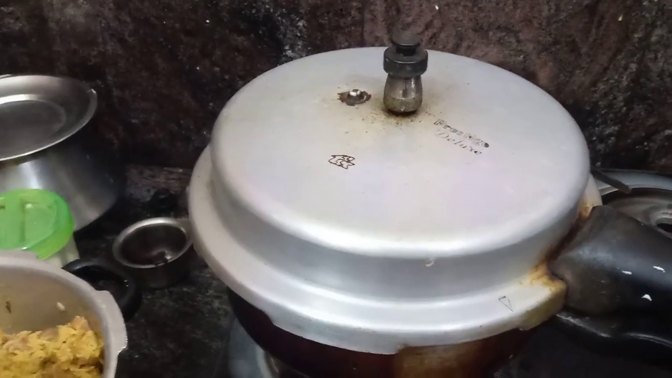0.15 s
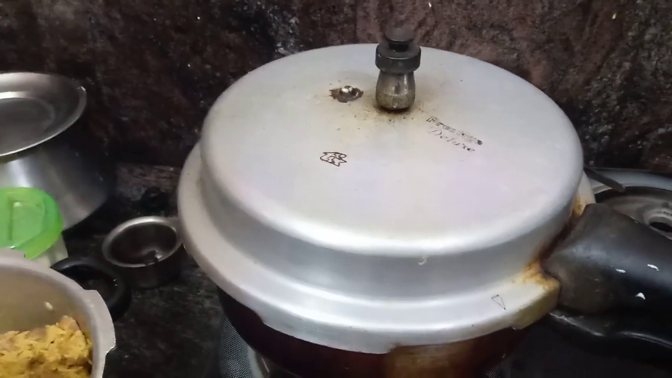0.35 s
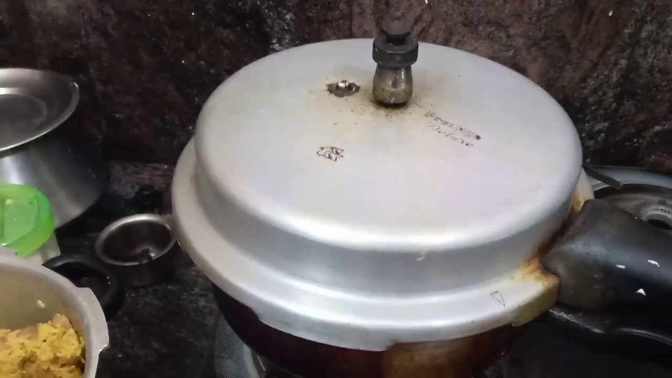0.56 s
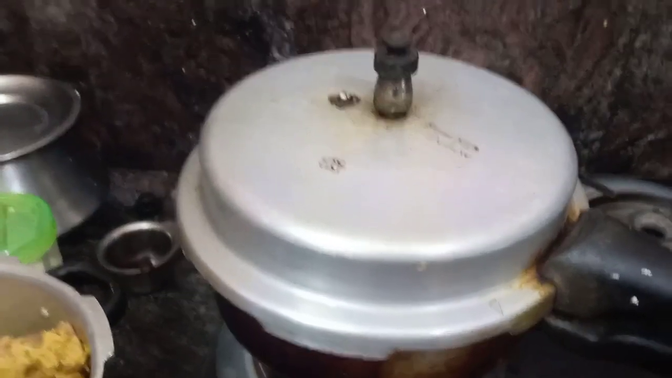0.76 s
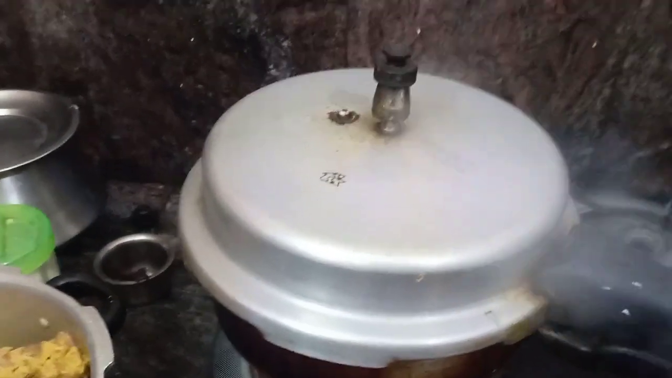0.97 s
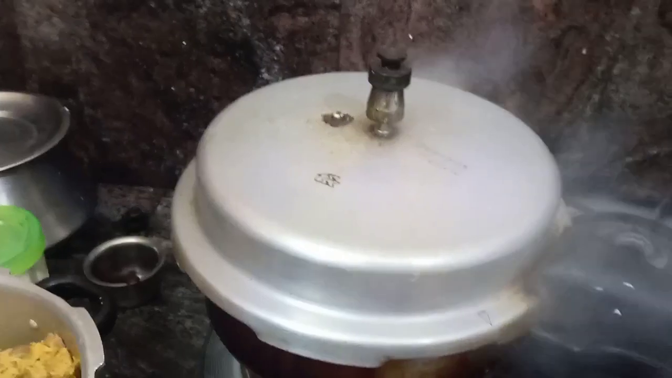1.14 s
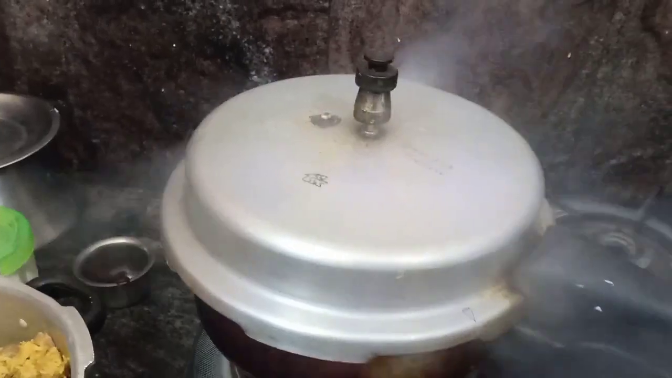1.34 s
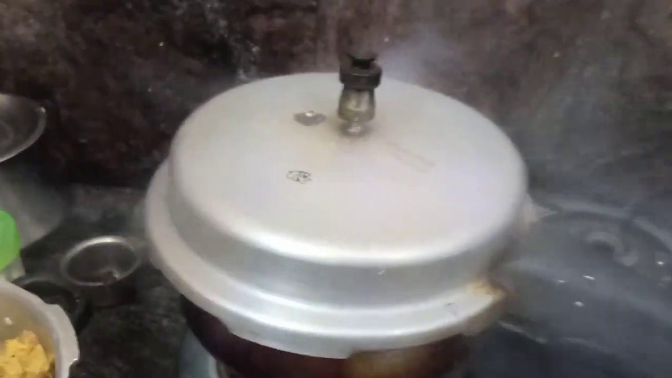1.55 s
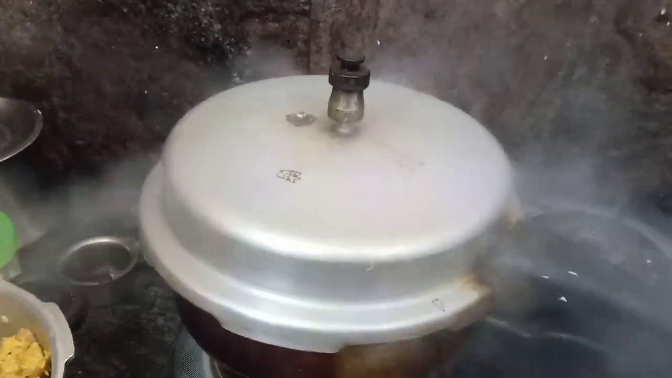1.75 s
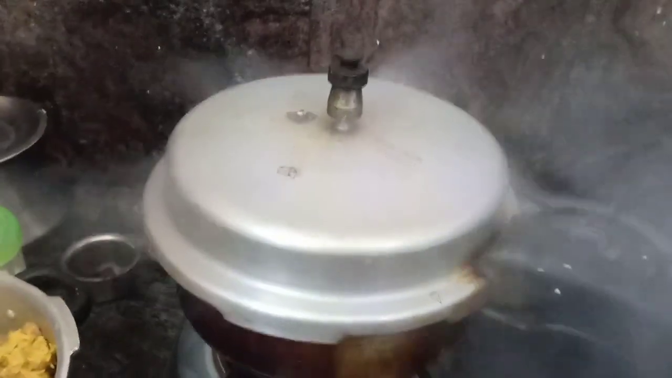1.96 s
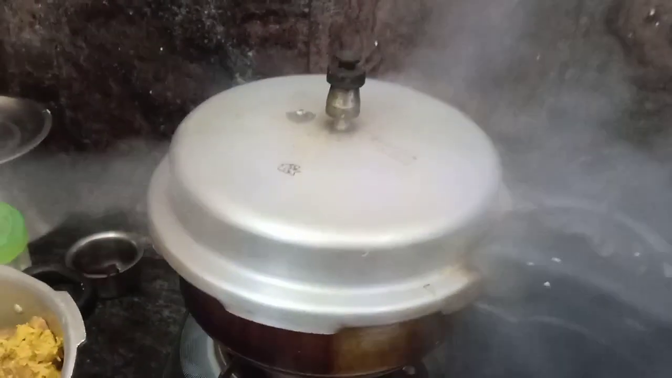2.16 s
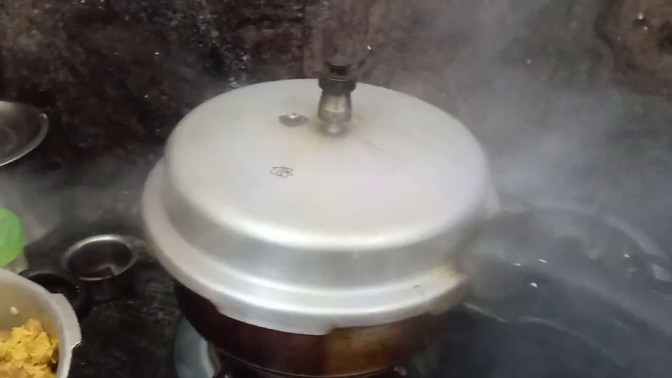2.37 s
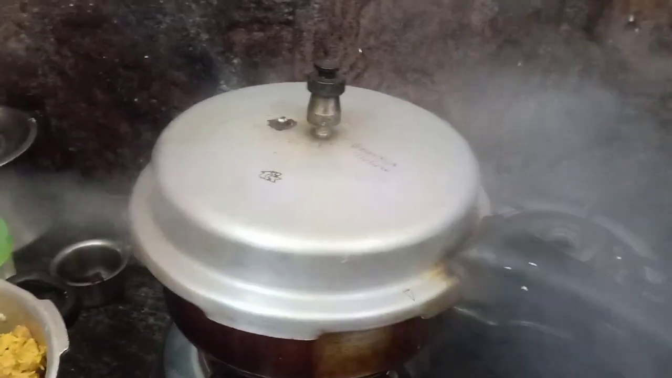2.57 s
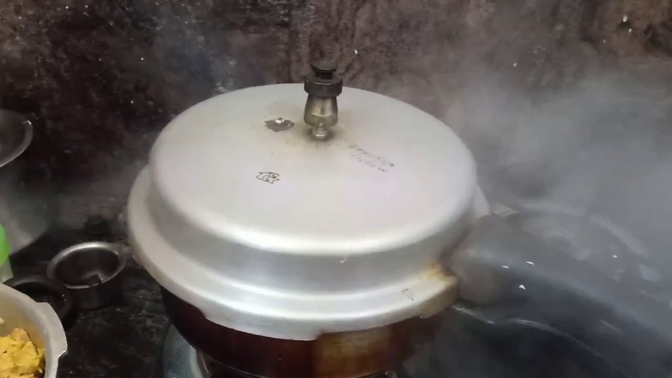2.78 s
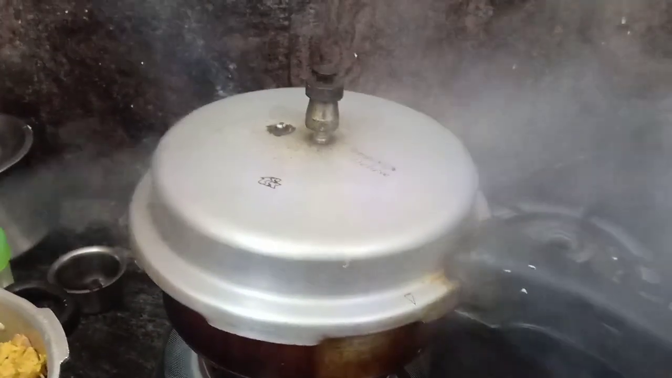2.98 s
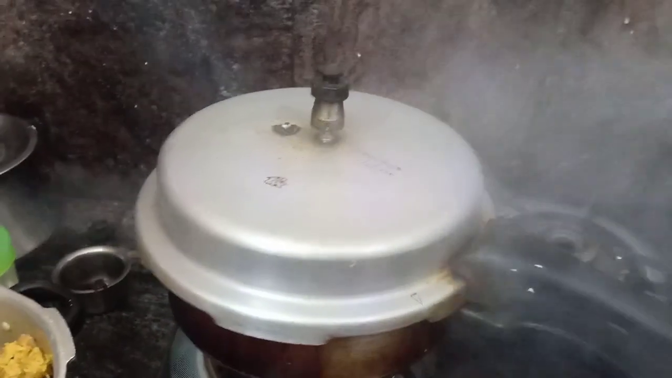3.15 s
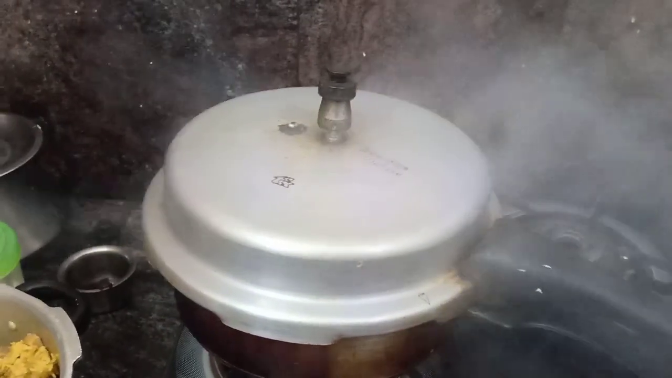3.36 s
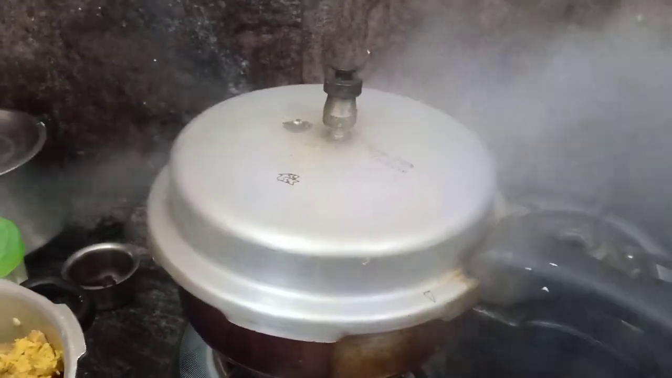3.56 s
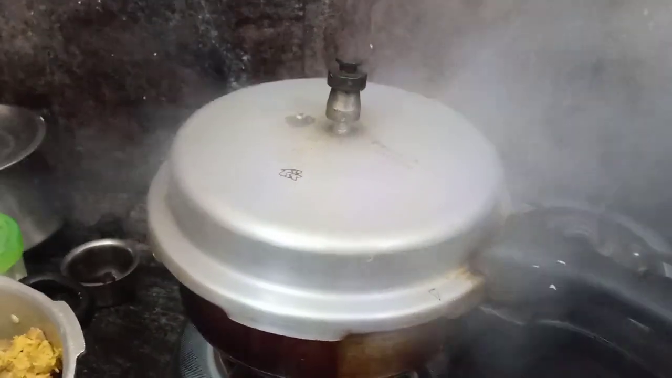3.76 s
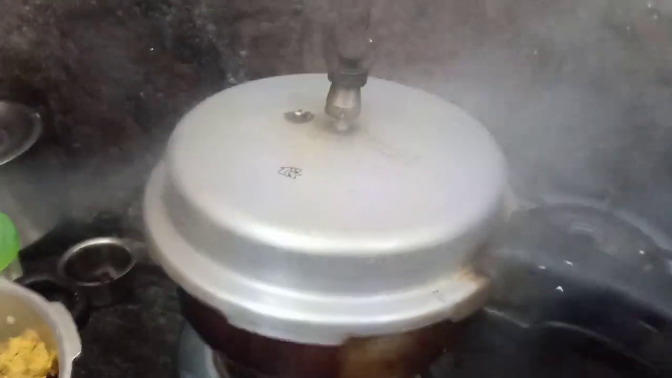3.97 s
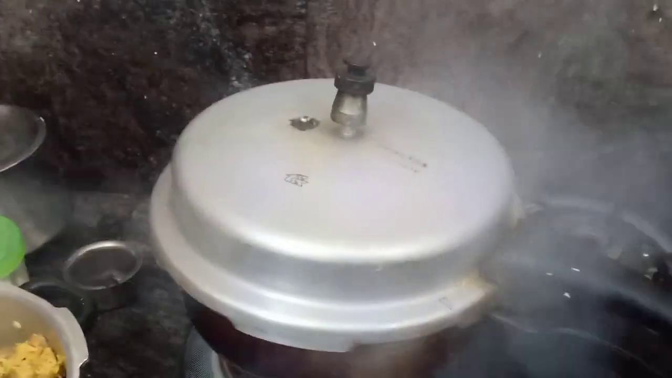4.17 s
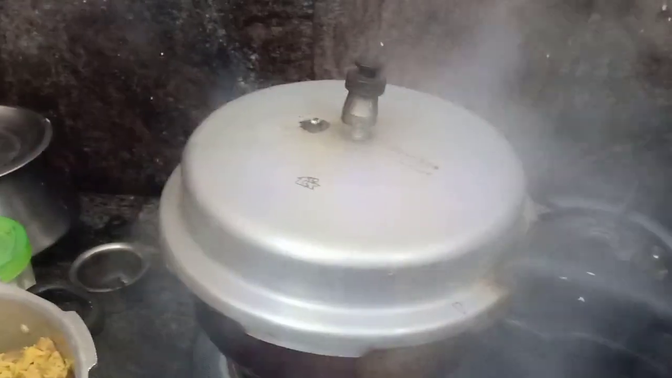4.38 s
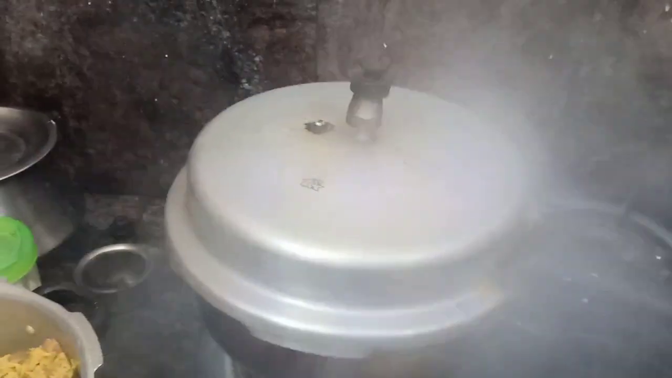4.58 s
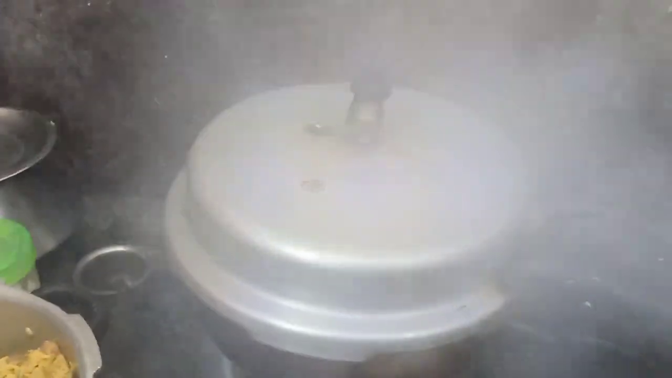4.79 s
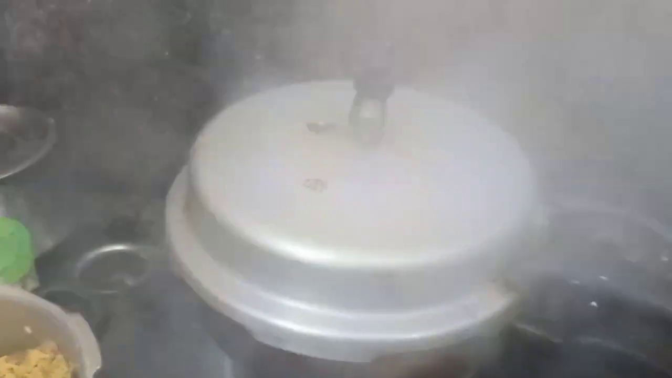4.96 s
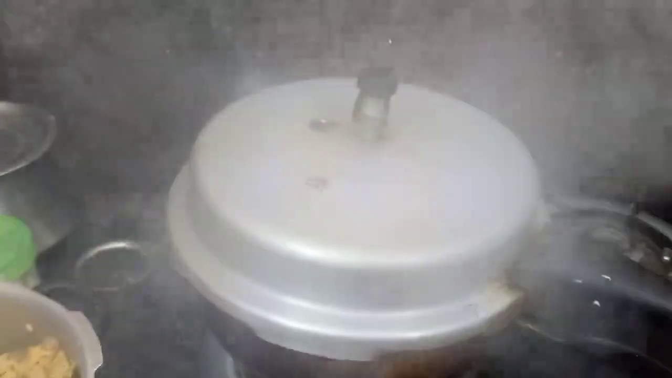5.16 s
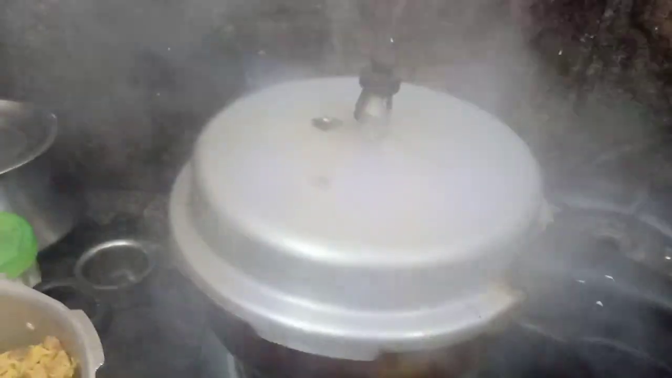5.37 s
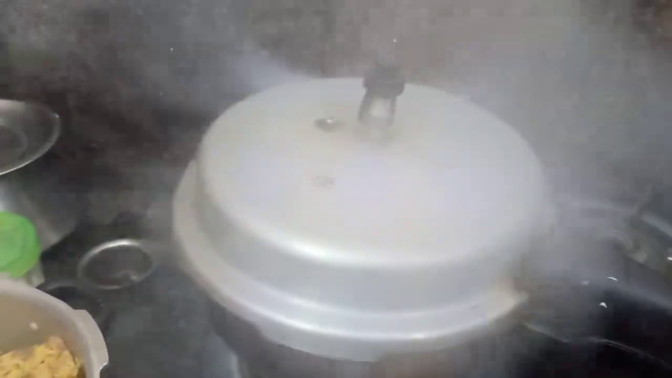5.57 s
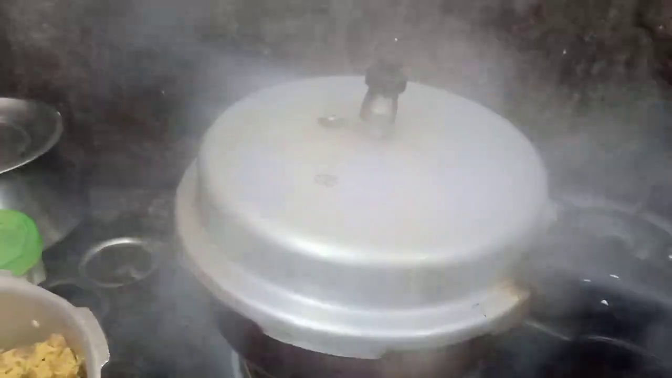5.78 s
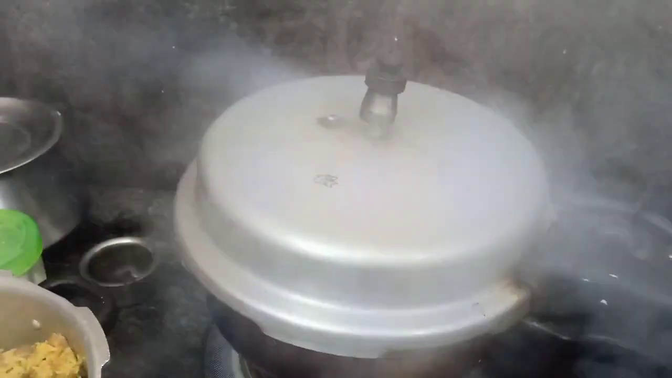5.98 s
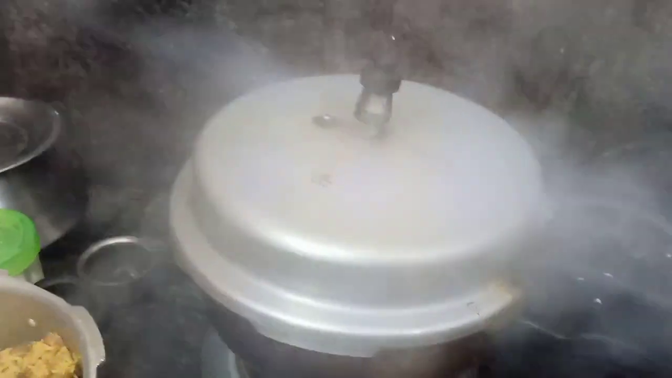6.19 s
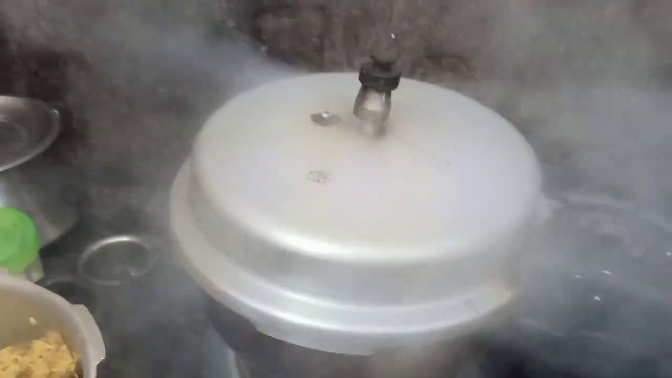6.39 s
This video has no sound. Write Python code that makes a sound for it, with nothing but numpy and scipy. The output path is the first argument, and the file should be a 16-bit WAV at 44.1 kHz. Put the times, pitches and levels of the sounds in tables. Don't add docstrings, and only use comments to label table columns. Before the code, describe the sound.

A thin pressure-cooker hiss sputters and knocks, then bursts into a loud roaring steam jet, crackling and popping from overload until the end.

```python
import sys
import numpy as np
from scipy import signal
from scipy.io import wavfile
from scipy.ndimage import uniform_filter1d

SR = 44100
rng = np.random.default_rng(int(sys.argv[2]) if len(sys.argv) > 2 else 0)


def makeup_ratio(level_db):
    decades = np.asarray(level_db, float) / 20
    return 10 ** decades


def bounce(signal):
    frames = np.transpose(np.atleast_2d(signal))
    limited = np.clip(frames, -1, 1)
    pcm = np.round(limited * 32767).astype(np.int16)
    wavfile.write(sys.argv[1], SR, pcm)


N = 283563
T = np.arange(N) / SR
HZ, HOP = np.fft.rfftfreq(1024, 1 / SR), 256
FRAME_S = np.arange(N // HOP + 5) * HOP / SR

# time in seconds, level in dB.
LEAK_LEVEL = [
    (0.0, -38.5),
    (0.51, -37.5),
    (0.52, -34),
    (0.64, -31),
    (0.66, -30),
    (0.715, -27),
    (0.735, -25),
    (0.752, -32),
    (0.78, -26.5),
]
# frequency in Hz, left level in dB, right level in dB.
LEAK_COLOUR = [(900, -26, -32), (1360, -14.5, -16), (2570, -7.5, -7), (3600, -9.5, -7.5), (4200, -3.5, -12),
               (4900, -2, -7.5), (5800, -2, -13.5), (6640, -6.5, -17), (7600, -14.5, -23), (9600, -19, -35),
               (11500, -13, -23), (13200, -18, -28), (15400, -14.5, -30.7)]
# frequency in Hz, width in Hz, lift in dB.
LEAK_PEAKS = [(4700, 220, 2), (5860, 170, 5), (6540, 77, -2), (2530, 210, 0.5)]
# frequency in Hz, level in dB per Hz.
ROOM_COLOUR = [(18, -48), (30, -37), (70, -5), (93, -30), (140, -10), (367, -7), (477, -4), (526, -14.5),
               (846, -7), (1500, -18.5), (1950, -48), (3300, -120)]
# frequency in Hz, likeness from 0 to 1.
ROOM_LIKENESS = [(60, .99), (290, 0.87), (640, 0.46), (1400, .05)]
# start in seconds, peak in dB, pitch in Hz.
SPUTTERS = [
    (0.294, -27, 5340),
    (0.521, -27, 5530),
    (0.6206, -21, 5200),
    (0.656, -13.5, 5700),
    (0.6905, -14, 5600),
    (0.729, -13, 5800),
]
# time in seconds, level in dB, wetness from 0 to 1.
JET_FLOW = [(0.76, -18.5, 0.2), (0.88, -18, 0.5), (1.2, -25.5, 0.18), (1.42, -23.5, 0.2),
            (1.47, -20.5, 0.2), (1.6, -20, 0.2), (1.75, -23, 0.22), (2.7, -22.5, 0.24), (3.3, -21.5, 0.22),
            (3.63, -22.5, 0.27), (3.85, -24, 0.61), (5.83, -23.5, 1), (5.86, -25.5, 0.98),
            (6.43, -24.5, 0.94)]
# frequency in Hz, left level in dB, right level in dB.
DRY_STEAM = [(121, -17, -35), (704, -17.5, -23.5), (1390, -20.5, -23.5), (1850, -11, -13), (2600, -6, -6),
             (3420, -6, -4.4), (3700, -5, -3.5), (4400, 0.5, -5), (5820, -4, -11.5), (6700, -12, -18.5),
             (7900, -12.5, -23.5), (9600, -15.5, -24.5), (12700, -13, -26), (17400, -14, -24)]
# frequency in Hz, left level in dB, right level in dB.
WET_STEAM = [(120.8, -31.5, -51), (714, -12.5, -21), (1290, -16.5, -17.5), (1810, -8.3, -10),
             (2670, 1.5, 0), (3420, -3.5, -1.5), (4000, 1, -1.5), (4980, 0, -6.5), (5660, 2, -4),
             (7900, -2, -12.5), (8100, -4.5, -16), (9530, -7, -20), (12700, -6.5, -17), (17000, -3, -13)]
# frequency in Hz, width in Hz, lift in dB.
JET_PEAKS = [(11350, 650, 5), (13550, 750, 5.5)]
# frequency in Hz, width in Hz, lift in dB.
LEFT_ECHO_PEAKS = [(2560, 50, 3), (2760, 90, 4), (3560, 60, 3), (4050, 70, 7), (4975, 110, 6.5),
                   (5333, 50, 6.5), (6815, 60, 2.5), (8010, 150, 3)]
# frequency in Hz, width in Hz, lift in dB.
RIGHT_ECHO_PEAKS = [(2590, 90, 4), (2840, 70, 3), (3424, 60, 2.5), (3935, 60, 6.5), (4785, 60, 3),
                    (5047, 60, 3), (7007, 120, 4)]
# frequency in Hz, likeness from 0 to 1.
STEAM_LIKENESS = [(1500, .05), (2600, .6), (3200, .3), (3900, .8), (4700, .75), (5600, .3), (8000, .05)]
# frequency in Hz, lead in radians.
LEFT_LEAD = [(0, 4), (1890, 0.47), (3450, 2), (3880, 1.5), (4570, 2.5), (5080, -3.5), (5770, 20.5),
             (6460, 51), (7320, 41), (10400, -13), (13500, 14), (14600, 11), (15200, 13), (16500, 32)]
# time in seconds, crackle level in dB.
STRIKE = [(0.76, -27), (1.05, -28.5), (1.12, -39), (1.41, -42), (1.61, -38.5), (2.4, -42.5), (2.85, -41.5),
          (3.18, -36.5), (3.58, -41.5), (3.65, -36), (3.7, -41), (4.39, -44.5), (4.7, -50.5), (5.1, -39),
          (5.55, -44.5), (5.83, -37.5), (6.06, -38), (6.43, -42)]
# time in seconds, peak in dB, direction (1 up, -1 down).
POPS = [(0.7646, -6, -1), (0.8336, -10, -1), (0.88, -3, 1), (0.9285, -4.5, -1), (0.9534, -15, 1),
        (1.2846, -11.5, 1), (1.4408, -11.5, 1), (1.5645, -12, 1), (1.5731, -9, -1), (1.6181, -6.5, -1),
        (1.7709, -9, -1), (1.7928, -10.5, -1), (1.8258, -11, -1), (1.9237, -12, -1), (2.9122, -10, 1),
        (3.051, -21, -1), (3.185, -10, 1), (3.3898, -20, 1), (3.6451, -6, -1), (3.781, -15, -1),
        (4.359, -11, -1), (4.4353, -11, -1), (5.0516, -17, -1), (5.08, -10, -1), (5.2202, -14, 1),
        (5.624, -11.5, 1), (5.8975, -13.5, -1), (5.9397, -13, -1), (6.0374, -20, -1), (6.0695, -10, 1)]
# frequency in Hz, left and right step in dB over the level around.
TREBLE_STEPS = [(4700, -7, -3), (5800, -5.5, 0), (6900, -3, 3.5), (7500, -2, 6.5), (8500, 0, 7.5),
                (10000, -.5, 7), (12000, -1.5, 6.5), (14500, -2, 7.5), (15300, 1, 11)]

LIFT_S, LIFT_RISE_S = .757, 0.0099
MIDS_LAG_DB = -1.5
ROOM_DB, FLAME_HZ, FLAME_DB = -45, 67.5, -59
TICK_S, TICK_DB = .5215, -16.5
LIFT_FIZZ_DB, LIFT_FIZZ_S, LEAN_DB = 2, 0.069, 0.3
SETTLE_S = 2.3
REBOUND_UP, REBOUND_DOWN = 0.37, 0.065
STRAY_PER_S, STRAY_DB, STRAY_FOLLOW = 18, -13.5, 0.46
THUMP_DB, THUMP_FOLLOW, THUMP_LUMP_DB = -0.5, 0.26, 1.5
THUMP_SAG_DB_PER_S = -0.67
LIFT_THUMP_DB, LIFT_THUMP_S = 9, .025


def evened(x):
    return x / np.sqrt(np.mean(x ** 2) + 1e-20)


def read(table, column=1):
    rows = np.transpose(table)
    return np.interp(np.log(HZ + 1), np.log(rows[0] + 1), rows[column])


def both(table):
    return np.array([read(table, column=1), read(table, column=2)])[:, :, None]


def humps(peaks):
    return sum(db / (1 + (2 * (HZ - hz) / width) ** 2) for hz, width, db in peaks)


def patches(frames, bins):
    field = rng.standard_normal((len(FRAME_S), len(HZ)))
    for _ in range(2):
        field = uniform_filter1d(uniform_filter1d(field, frames, 0), bins, 1)
    return evened(field).T


def drift(top_hz):
    lowpass = signal.butter(2, top_hz, fs=SR, output="sos")
    return evened(signal.sosfilt(lowpass, rng.standard_normal(N)))


def noise(colour_db, same, lead=0):
    a, b, c, d = rng.standard_normal((len(FRAME_S), len(HZ), 4)).T
    same = np.clip(same, 0, 1)[:, None]
    left = a + 1j * b
    right = same * left * np.exp(-1j * lead) + np.sqrt(1 - same ** 2) * (c + 1j * d)
    spectrum = np.array([left, right]) * makeup_ratio(colour_db)
    out = signal.istft(spectrum, nperseg=1024, noverlap=1024 - HOP)[1][:, :N]
    return out / np.sqrt(np.mean(out.mean(0) ** 2))


def reflections(fixed_db, moving_db):
    still = evened(uniform_filter1d(rng.standard_normal((2, len(HZ), 1)), size=2, axis=1))
    moving = np.array([patches(frames=50, bins=1), patches(frames=50, bins=1)])
    return fixed_db * still + moving_db * moving


def lifted():
    return 1 / (1 + np.exp(-np.clip((T - LIFT_S) / (LIFT_RISE_S / 4), -50, 50)))


def leak():
    hz = HZ[:, None]
    cavity_hz = np.interp(FRAME_S, [.45, .76], [5340, 5520])
    cavity_db = np.array([9, 4])[:, None, None] * np.interp(FRAME_S, [.5, .66], [1, 1.6])
    colour = both(LEAK_COLOUR) + humps(LEAK_PEAKS)[:, None]
    colour = colour + cavity_db / (1 + (2 * (hz - cavity_hz) / 340) ** 2)
    colour = colour + reflections(fixed_db=0.4, moving_db=1.3)
    colour = colour + np.interp(FRAME_S, [.6, .76], [0, 3.5]) / (1 + (6800 / (hz + 1)) ** 8)
    mids_lag = MIDS_LAG_DB * np.interp(FRAME_S, [.49, .53, .62, .74], [0, 1, 1, 0])
    colour = colour + mids_lag / (1 + (hz / 4500) ** 8)
    hiss = noise(colour, read(STEAM_LIKENESS), read(LEFT_LEAD)[:, None])
    level_db = uniform_filter1d(np.interp(T, *np.transpose(LEAK_LEVEL)), size=700)
    flutter_db = 0.77 * drift(top_hz=45.3)
    return hiss * makeup_ratio(level_db + 5.5 + flutter_db) * np.exp(-np.maximum(T - .79, 0) / 0.033)


def room():
    colour = read(ROOM_COLOUR)[:, None] + 1.0 * patches(frames=10, bins=3)
    air = makeup_ratio(ROOM_DB) * noise(np.array([colour, colour]), read(ROOM_LIKENESS))
    flame = np.sqrt(2) * np.sin(2 * np.pi * FLAME_HZ * T + .8 * drift(top_hz=4))
    flame = flame * makeup_ratio(1.5 * drift(top_hz=8))
    duck_db = -3.5 * np.clip((T - .5) / 1.4, 0, 1) - 10 * lifted()
    return (air + makeup_ratio(FLAME_DB - 0.5) * flame) * makeup_ratio(duck_db)


def sputters():
    out, t = np.zeros(N), np.arange(1200) / SR
    puffs = rng.standard_normal((len(SPUTTERS), len(t)))
    for (s, db, hz), puff in zip(SPUTTERS, puffs):
        cavity = signal.iirpeak(hz, 7, fs=SR)
        ring = evened(signal.lfilter(*cavity, signal.lfilter(*cavity, puff)))
        swell = (1 - np.exp(-t / 0.0016)) * np.exp(-t / 0.008)
        out[round(s * SR):][:len(t)] += makeup_ratio(db - 1.0) * ring * swell
    knock_band = signal.butter(4, [1500, 6800], "band", fs=SR, output="sos")
    knock = evened(signal.sosfilt(knock_band, rng.standard_normal(88)))
    out[round(TICK_S * SR):][:88] += makeup_ratio(TICK_DB) * knock * np.exp(-t[:88] / .0008)
    return out * makeup_ratio(np.array([[3.5], [-7]]))


def jet():
    s, level_db, wet = np.transpose(JET_FLOW)
    wet = np.interp(FRAME_S, s, np.clip(wet, -.3, 1.3))
    colour = (1 - wet) * both(DRY_STEAM) + wet * both(WET_STEAM)
    colour = colour + humps(JET_PEAKS)[:, None]
    ringing = np.clip(1.25 - 1.3 * wet, .1, 2) * np.clip(.15 + (FRAME_S - LIFT_S) / SETTLE_S, 0, 1)
    colour = colour + ringing * np.array([humps(LEFT_ECHO_PEAKS), humps(RIGHT_ECHO_PEAKS)])[:, :, None]
    fizz_db = LIFT_FIZZ_DB * np.exp(-np.maximum(FRAME_S - LIFT_S, 0) / LIFT_FIZZ_S)
    colour = colour + fizz_db / (1 + (7500 / (HZ[:, None] + 1)) ** 6)
    colour = colour + LEAN_DB * np.array([.5, -.5])[:, None, None]
    colour = colour + reflections(fixed_db=1.15, moving_db=1.22)
    colour = colour + 0.54 * patches(frames=8, bins=14)
    band = (HZ > 2000) & (HZ < 7000)
    power = uniform_filter1d((makeup_ratio(colour[:, band]) ** 2).mean((0, 1)), size=40)
    roar = noise(colour - 10 * np.log10(power), read(STEAM_LIKENESS), read(LEFT_LEAD)[:, None])
    surge_db = .25 * drift(top_hz=14)
    return roar * makeup_ratio(np.interp(T, s, level_db) + 1.45 + surge_db) * lifted()


def kitchen(x, wet_db, t60):
    t = np.arange(round(t60 * SR)) / SR
    tail = rng.standard_normal((2, len(t))) * makeup_ratio(-60 * t / t60) * (t > .003)
    tail = signal.sosfilt(signal.butter(2, 8000, fs=SR, output="sos"), tail)
    echo = makeup_ratio(wet_db) * tail / np.linalg.norm(tail[0]) + (t == 0)
    return signal.oaconvolve(x, echo / np.linalg.norm(echo[0]), axes=1)[:, :N]


def pulse(width_s):
    push = np.exp(-.5 * (np.arange(-64, 2000) / SR / width_s) ** 2)
    return signal.lfilter(*signal.butter(1, 120, "high", fs=SR), push)


def small_crackle(chance, size, share, strike_db):
    lag = rng.integers(14, 44, N)
    bunching = makeup_ratio(2.2 * drift(top_hz=10))
    hits = (chance < 800 / SR) * makeup_ratio(2.96 * np.minimum(size, 3.4)) * bunching
    kicks = np.bincount(np.arange(N) + lag, hits * (1 - share))[:N]
    spikes = hits * share - 1.52 * kicks
    small = evened(signal.oaconvolve(spikes, pulse(width_s=.00008))[64:N + 64])
    return small * makeup_ratio(strike_db + 6.5) * lifted()


def big_pops(chance, size, share, strike_db):
    big = (chance > 1 - STRAY_PER_S / SR) * np.sign(share - .4) * lifted()
    big = big * makeup_ratio(STRAY_DB - 5.4 * size + STRAY_FOLLOW * (strike_db + 41))
    at, db, direction = np.transpose(POPS)
    big[np.round(at * SR).astype(int)] = np.sign(direction) * makeup_ratio(db)
    big = big - np.roll(big * np.where(big > 0, REBOUND_UP, REBOUND_DOWN), 28)
    return 0.92 * signal.oaconvolve(big, pulse(width_s=0.00013))[64:N + 64]


def crackle():
    strike_db = np.interp(T, *np.transpose(STRIKE))
    chance, size, share = rng.random(N), rng.exponential(1, N), rng.random(N)
    overload = small_crackle(chance, size, share, strike_db) + big_pops(chance, size, share, strike_db)
    thump_band = signal.butter(2, [50, 190], "band", fs=SR, output="sos")
    recovery = signal.sosfilt(thump_band, abs(overload))
    thump_db = THUMP_DB + THUMP_FOLLOW * np.minimum(strike_db + 40.5, 3)
    thump_db = thump_db + THUMP_LUMP_DB * drift(top_hz=4.7) + THUMP_SAG_DB_PER_S * (T - 3)
    lift_db = LIFT_THUMP_DB * np.exp(-np.maximum(T - LIFT_S, 0) / LIFT_THUMP_S)
    return np.array([overload + recovery * makeup_ratio(thump_db + lift_db), np.zeros(N)])


def scene():
    steam = kitchen(leak() + sputters() + jet(), wet_db=-10, t60=.25)
    return steam + crackle() + room()


def coarse_treble(x, chance_db, offset):
    n, count = np.arange(2048) + .5, N // 1024 + 2
    waves = np.cos(np.pi / 1024 * np.outer(n[:1024], n + 512))
    lapped = np.sin(np.pi * n / 2048) * waves / np.sqrt(512)
    padded = np.pad(x, ((0, 0), (1024 - offset, 3072)))
    lines = padded[:, np.arange(count)[:, None] * 1024 + np.arange(2048)] @ lapped.T
    power = (lines ** 2).reshape(2, count, 32, 32).mean(3)
    smooth = uniform_filter1d(uniform_filter1d(power, size=3, axis=2), size=3, axis=1)
    around = np.sqrt(abs(smooth)) + 1e-9
    wobble = makeup_ratio(chance_db * rng.standard_normal(power.shape))
    line_hz = n[:1024] * SR / 2048
    hz, *over_db = np.transpose(TREBLE_STEPS)
    over = makeup_ratio(np.array([np.interp(line_hz, hz, port_db) for port_db in over_db]))[:, None]
    step = np.repeat(around * wobble, 32, axis=2) * over
    rounded = np.sign(lines) * np.floor(abs(lines) / step + .4054) * step
    frames = np.where(line_hz > hz[0], rounded, lines) @ lapped
    joined = (frames[:, 1:, :1024] + frames[:, :-1, 1024:]).reshape(2, -1)
    return np.concatenate([x[:, :offset], joined], axis=1)[:, :N]


def low_pass(x):
    return signal.sosfilt(signal.butter(12, 15510, fs=SR, output="sos"), x)


def record(dry):
    bent = dry + np.array([[.12], [-.16]]) * dry ** 2
    cut = signal.sosfilt(signal.butter(3, 47, "high", fs=SR, output="sos"), bent)
    mix = coarse_treble(np.clip(cut, -1, 1), chance_db=1.5, offset=59)
    return low_pass(mix)


dry = scene()
out = record(dry)
bounce(out)
```